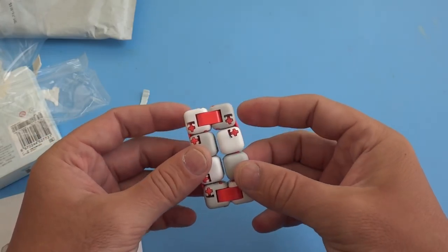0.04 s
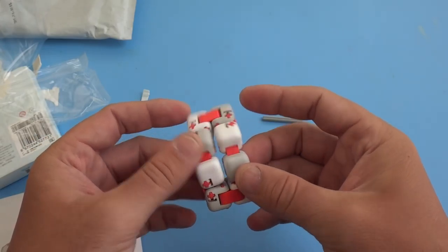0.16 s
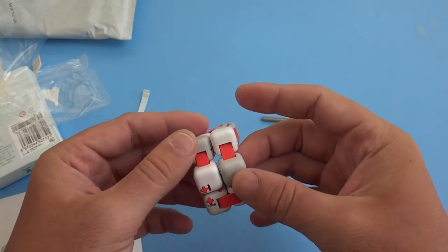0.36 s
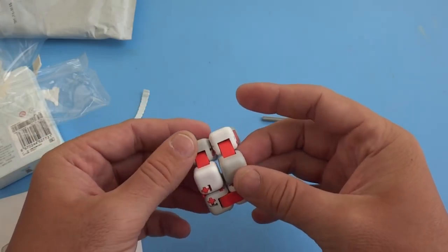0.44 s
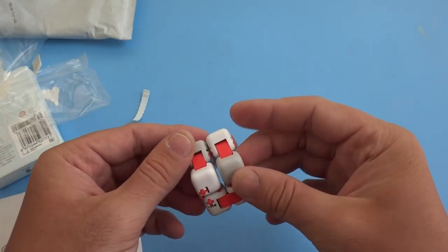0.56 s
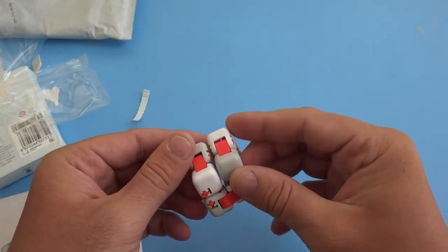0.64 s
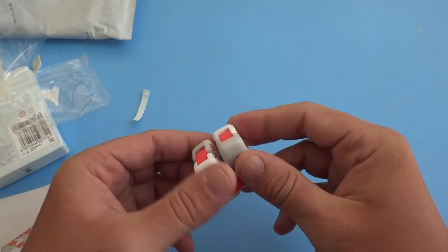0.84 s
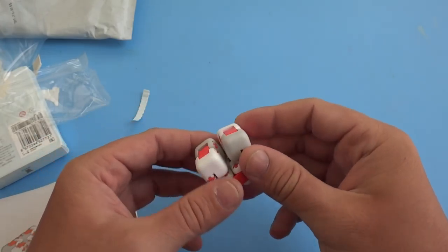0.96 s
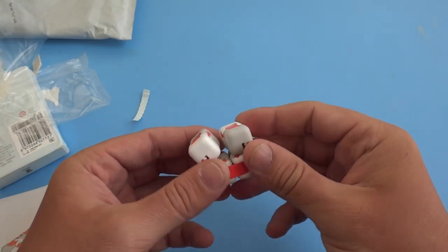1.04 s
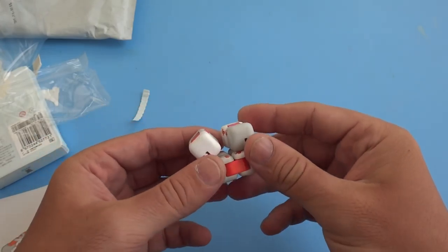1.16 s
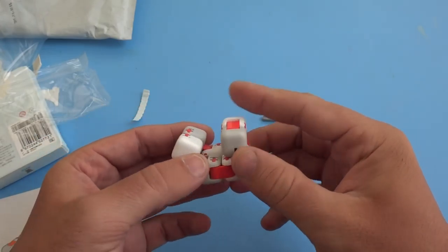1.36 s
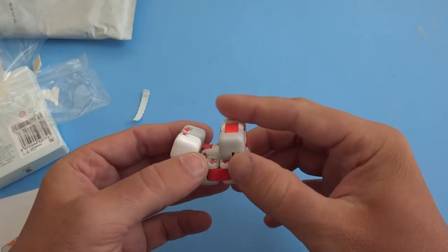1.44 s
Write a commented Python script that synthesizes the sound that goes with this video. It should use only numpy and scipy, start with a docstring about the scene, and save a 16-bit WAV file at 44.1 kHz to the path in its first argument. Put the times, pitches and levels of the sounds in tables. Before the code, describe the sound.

After a brief quiet start, a tight cluster of bright plastic clicks snaps out, followed by scattered softer clicks and one strong clack midway; fingers rub lightly, close-miked in a small room with soft hiss and hum.

```python
"""A low hum, room hiss and a faint regular device tick run throughout; over them small plastic blocks click.
Two hands fold a hinged toy just above a table, close up; its clicks are short and bright, sums of brief
decaying partials coloured by a microphone resonance near 6.7 kHz. Fingers rustle as a shower of tiny slips.
Each click comes back off the table, then off a wall, and dies in a small room built from shaped noise."""
import sys
import numpy as np
from scipy import signal
from scipy.fft import rfft, irfft
from scipy.io import wavfile

SR = 44100
rng = np.random.default_rng(int(sys.argv[2]) if len(sys.argv) > 2 else 0)


def digitize_waveform(pressure):
    """Quantize a signal to 16-bit integers and store it at the path in sys.argv[1].

    Rows of a 2-D input are taken as channels; values are limited to [-1, 1].
    """
    field = np.atleast_2d(pressure).T
    bounded = np.clip(field, -1, 1)
    quanta = np.round(bounded * 32767).astype(np.int16)
    wavfile.write(sys.argv[1], SR, quanta)


def nominal_scale(level):
    """Amplitude ratio for a level in decibels (scalar or array-like)."""
    x = np.asarray(level, float) / 20
    return 10 ** x


N = 66150  # length [samples]

# Blocks meeting: (time [s], peak [dB], pitch [Hz], second contact re first [dB],
# treble partials gain [dB], low partials gain [dB])
BLOCK_CLICKS = [(0.1939, -39.5, 6600, 1, 4, 4), (0.204, -34, 6240, -8, 2, -12),
                (0.2191, -16.5, 6400, -20, -2, -18), (0.2186, -10.5, 6690, -21, -7.5, -30),
                (0.2356, -10, 6830, -2.5, -18, -35), (0.2486, -25.5, 6730, 4.5, -9, -26),
                (0.2642, -23, 6260, -11, -12, -12), (0.4137, -21, 6560, -4, 5, -8),
                (.5873, -38.5, 6640, -8, -5, -6), (0.5984, -36, 6570, -7, -4, -8),
                (0.633, -33.5, 6350, -10, -1, -2), (0.6383, -29.5, 6830, -14, 9, 4),
                (0.6413, -27, 6360, -8, 5, -5), (0.6423, -29, 6940, -3, 1, 3.5),
                (0.6693, -20.5, 6440, -6, -10, -4), (.6873, -40, 6860, -8, -9, 14),
                (0.7666, -38, 6500, -12, -7, -6), (0.7782, -13.5, 6533, 4.5, 1.5, -3.5),
                (0.7815, -22.5, 6630, -20, 3, -26), (0.8557, -35, 6640, -7, -3, 4),
                (0.9459, -38.5, 6300, 2, 1, 3), (0.9483, -32.5, 5940, 1.5, 2, 6),
                (.9516, -31, 6350, -6, 6, -6), (1.0198, -19.5, 6890, 1.5, -2, -5.5),
                (1.0284, -26, 6000, -15, -5, -10), (1.0713, -35.5, 6300, -1, -2, -3),
                (1.093, -40, 6560, 2.5, -8, 8), (1.1240, -33.5, 6930, -2.5, -3, -4),
                (1.1353, -42, 5930, -2, -4, 0), (1.1458, -41, 6300, 2, -3, 9),
                (1.1782, -38.5, 6700, -5, -4, -4), (1.2465, -34, 6300, -9, -1, -8)]
# Partials of a click around the microphone resonance, above it and below it:
# (multiple of the pitch [ratio], relative level [dB], decay time [s])
RESONANCE_PARTIALS = [(.84, -15.5, 0.00037), (1.0, -2, 0.00024), (1.13, -8.5, 0.00026), (1.26, -9.5, .0003)]
TREBLE_PARTIALS = [(1.53, -14.5, 0.00026), (1.85, -17.5, 0.00014), (2.17, -17, 0.00025)]
LOW_PARTIALS = [(.28, -34.5, 0.00041), (.4, -28.5, 0.00027), (.53, -25.5, 0.00034), (.64, -27, 0.00039)]
# Loudness of the fingers on plastic: (time [s], level [dB])
FINGER_LEVEL = [(0, -72), (.19, -63), (.2, -53), (.211, -51), (.217, -38.5), (.228, -54), (.246, -37),
                (.27, -42), (.32, -53), (.4, -68), (0.421, -44.5), (.46, -62), (.57, -61.5), (.63, -59.5),
                (.645, -49), (.66, -54), (.7, -60), (.725, -54), (.77, -54.5), (.8, -48), (.87, -60),
                (.93, -64.5), (.95, -50), (.97, -53), (1.0, -72), (1.03, -40.5), (1.05, -66), (1.09, -54.5),
                (1.15, -61), (1.22, -65), (1.26, -54), (1.32, -70), (1.5, -67)]
# Returns from surfaces: (delay [s], level [dB], smear [s])
SURFACE_ECHOES = [(.0065, -21.5, .001), (0.0132, -19.5, 0.0017), (0.027, -29, 0.0019)]
# How long the room tail lasts: (frequency [Hz], time to fall 60 dB [s])
ROOM_DECAY = [(2000, 0.24), (5300, 0.27), (9000, 0.18), (14000, .1)]
# Colour of the hum and hiss: (frequency [Hz], relative density [dB per Hz])
AIR_COLOUR = [(12, -22), (25, -24), (55, -12.5), (80, -15.5), (110, -15), (140, -8), (165, -12.5),
              (205, -6.5), (250, -15), (330, -19), (520, -17.5), (650, -20.5), (1400, -23), (2400, -25.5),
              (3200, -23.5), (3750, -27.5), (4200, -25), (4500, -19), (4900, -27.5), (6700, -19),
              (9000, -22), (13900, -26.5), (15600, -32), (15900, -54)]
# Width of the air: (frequency [Hz], left-right likeness [-1 to 1])
AIR_LIKENESS = [(30, 0.76), (80, 0.9), (160, 0.92), (290, 0.35), (640, -0.23), (1400, -0.4), (3100, 0.038),
                (6800, 0.57), (10000, 0.73), (15000, 1)]
# Stereo balance of the air: (frequency [Hz], left minus right [dB])
AIR_LEAN = [(60, -2), (240, 1), (950, -1.5), (3770, 0.5), (15000, -0.5)]
# Stereo balance of the toy and its room: (frequency [Hz], left minus right [dB])
TOY_BALANCE = [(2000, -5), (6000, -0.9), (9000, -4.5), (13000, 1.2)]

SECOND_S, CHATTER_DB, CHATTER_S = 0.001241, -12, 0.0018  # second contact delay; chatter gain, decay
DETUNE = 0.043  # random spread of the partials' ratios
RUBS_PER_S, RUB_SPREAD_DB = 2300, 4.0
RUB_TREBLE_DB, RUB_LOW_DB = -1.5, -5
ROOM_DB, ROOM_FILL_S, ROOM_LIKENESS = -14.5, 0.0061, 0.74
TICK_START_S, TICK_EVERY_S, TICK_HZ, TICK_DECAY_S = 0.0068, 0.04, 6700, 0.00041
TICK_DB, TICK_SPREAD_DB, TICK_SIDE = -43.5, 2, 0.23  # strongest tick, mean drop below it, stereo width
AIR_DB = -54
HUM_HZ, HUM_DB, HUM_WAVER_DB = 27.3, -65, 4.5
EDGE_HZ = 16200


def clicks():
    """Each click is a first and a second contact with a little chatter after them."""
    out = np.zeros(N)
    t = np.arange(400) / SR
    for s, db, hz, second_db, treble_db, low_db in BLOCK_CLICKS:
        strength = rng.standard_normal(400)
        sparse = rng.random(400) < 0.06
        taps = strength * sparse * np.exp(-t / CHATTER_S)
        first = contact(hz, treble_db, low_db)
        second = contact(hz, treble_db, low_db)
        chatter = np.convolve(taps, contact(hz, treble_db, low_db))
        add(out, s, nominal_scale(db) * first)
        add(out, s + SECOND_S, nominal_scale(db + second_db) * second)
        add(out, s + SECOND_S, nominal_scale(db + max(second_db, 0) + CHATTER_DB) * chatter)
    return out


def contact(hz, treble_db, low_db):
    """One short bright click: all partials at once, a little detuned each time; peak 1."""
    out = 0
    for partials, gain_db in [(RESONANCE_PARTIALS, 0), (TREBLE_PARTIALS, treble_db), (LOW_PARTIALS, low_db)]:
        for multiple, db, decay_s in partials:
            # the partial at the pitch itself stays in tune
            detune = 1 + DETUNE * rng.standard_normal() * (multiple != 1)
            polarity = rng.choice([-1, 1])
            out = out + polarity * blip(hz * multiple * detune, db + gain_db, decay_s)
    return out / abs(out).max()


def blip(hz, db, decay_s):
    """A partial swells softly and dies away; its envelope peaks at db after twice decay_s."""
    t = np.arange(200) / SR
    u = t / abs(decay_s) / 2
    envelope = (u * np.exp(1 - u)) ** 2
    return nominal_scale(db) * envelope * np.sin(2 * np.pi * min(hz, SR / 2.6) * t)


def fingers():
    """Tiny random slips of skin and hinges, each a faint short click."""
    strength = nominal_scale(RUB_SPREAD_DB * np.minimum(rng.exponential(1, N), 4))
    size = strength * (rng.random(N) < RUBS_PER_S / SR)
    kind = rng.integers(0, 12, N)  # which of 12 click sounds a slip makes
    slips = np.zeros(N)
    for k in range(12):
        sound = contact(rng.uniform(5710, 7050), RUB_TREBLE_DB, RUB_LOW_DB)
        slips += signal.oaconvolve(size * (kind == k), sound)[:N]
    s, db = np.transpose(FINGER_LEVEL)
    return nominal_scale(np.interp(np.arange(N) / SR, s, db)) * evened(slips)


def room(x):
    """A few smeared echoes, then a dense tail in which each band dies at its own speed."""
    t = np.arange(SR // 2) / SR
    a, b, c, d = rng.standard_normal((4, len(t)))
    same = np.clip(ROOM_LIKENESS, 0, 1)
    apart = np.sqrt(1 - same ** 2)
    hz, frame_s, z = signal.stft([a, same * a + apart * b], SR, nperseg=128)
    decay = nominal_scale(-60 * frame_s / read(ROOM_DECAY, hz)[:, None])
    tail = signal.istft(z * decay, SR, nperseg=128)[1][:, :len(t)]
    tail = tail * (1 - np.exp(-(t / ROOM_FILL_S) ** 2))  # the tail fills in gradually
    tail = nominal_scale(ROOM_DB) * tail / np.linalg.norm(tail[0])
    echo_noise = np.array([c, same * c + apart * d])
    for delay, db, smear in SURFACE_ECHOES:
        puff = np.exp(-((t - delay) / smear) ** 2) * echo_noise
        tail = tail + nominal_scale(db) * puff / np.linalg.norm(puff[0])
    return signal.fftconvolve(x[None], tail, axes=1)[:, :N]


def tick():
    """A faint short device tick at the microphone resonance, 25 times a second, uneven in strength."""
    out = np.zeros(N)
    for s in np.arange(TICK_START_S, N / SR, TICK_EVERY_S):
        db = TICK_DB - TICK_SPREAD_DB * rng.exponential()
        add(out, s, blip(TICK_HZ, db, TICK_DECAY_S))
    late = np.roll(out, 2)  # a slightly late copy, opposite in the two sides, widens it
    return np.array([out + TICK_SIDE * late, out - TICK_SIDE * late])


def air():
    """Hum and hiss: random short-time spectra, partly shared between the two microphones."""
    hz = np.fft.rfftfreq(2048, 1 / SR)
    a, b, c, d = rng.standard_normal((N // 512 + 5, 1025, 4)).T
    same = np.clip(read(AIR_LIKENESS, hz), -1, 1)[:, None]
    left = a + 1j * b
    right = same * left + np.sqrt(1 - same ** 2) * (c + 1j * d)
    colour = nominal_scale(read(AIR_COLOUR, hz) + np.outer([0.5, -0.5], read(AIR_LEAN, hz)))
    z = np.array([left, right]) * colour[:, :, None]
    noise = signal.istft(z, nperseg=2048, noverlap=1536)[1][:, :N]
    return nominal_scale(AIR_DB) * evened(noise)


def hum():
    """A very low tone of a distant machine, its strength wavering with a sum of slow sines."""
    t = np.arange(N) / SR
    rates = np.geomspace(0.7, 3, 8)  # Hz
    waver = evened(sum(np.sin(2 * np.pi * (f * t + rng.random())) for f in rates))
    level = nominal_scale(HUM_DB + HUM_WAVER_DB * waver)
    return level * np.sin(2 * np.pi * (HUM_HZ * t + rng.random()))


def evened(x):
    """Scales to rms 1."""
    return x / np.sqrt(np.mean(x ** 2) + 1e-20)


def read(points, hz):
    """Reads a table on a log-frequency axis."""
    f, value = np.transpose(points)
    return np.interp(np.log(hz + 1), np.log(f + 1), value)


def add(mix, s, sound):
    """Mixes a sound in at a time in seconds."""
    part = mix[round(s * SR):][:len(sound)]
    part += sound[:len(part)]


def scene():
    """The toy and its room, leaned in stereo band by band, over the tick, the air and the hum."""
    toy = clicks() + fingers()
    hz = np.fft.rfftfreq(N, 1 / SR)
    lean = nominal_scale(np.outer([0.5, -0.5], read(TOY_BALANCE, hz)))
    toy_in_room = irfft(rfft(toy + room(toy)) * lean, N)
    return toy_in_room + tick() + air() + hum()


def band_limit(x):
    """A steep low-pass at the top of the band."""
    return signal.sosfilt(signal.butter(12, 16670, fs=SR, output="sos"), x)


def record(dry):
    """Rolls off the top of the spectrum with a steep low-pass and finishes the mix."""
    low_pass = signal.firwin(255, EDGE_HZ, fs=SR)
    mix = signal.oaconvolve(dry, low_pass[None], "same")
    return band_limit(mix)


dry = scene()
out = record(dry)
digitize_waveform(out)
```